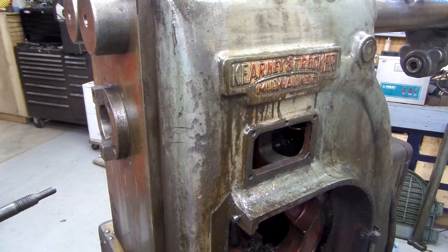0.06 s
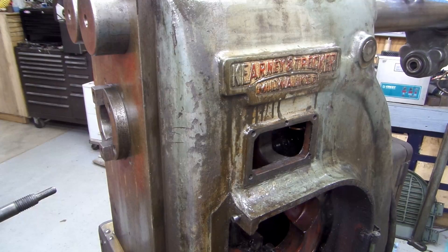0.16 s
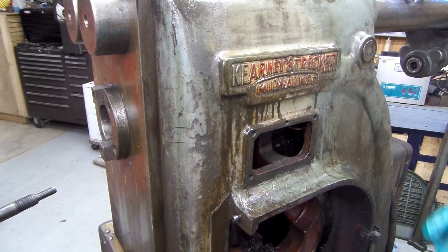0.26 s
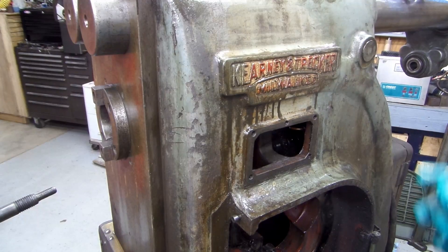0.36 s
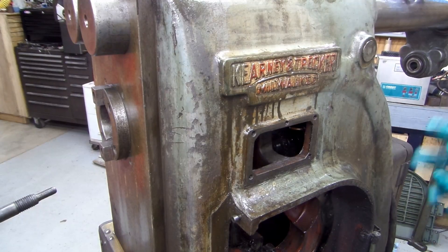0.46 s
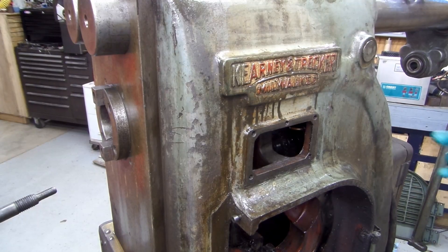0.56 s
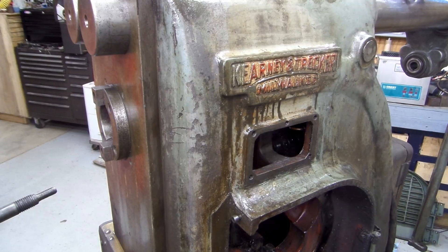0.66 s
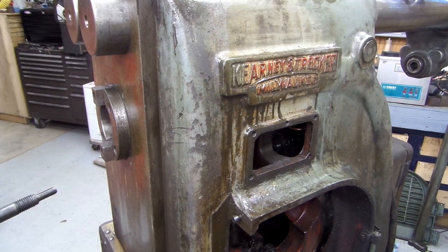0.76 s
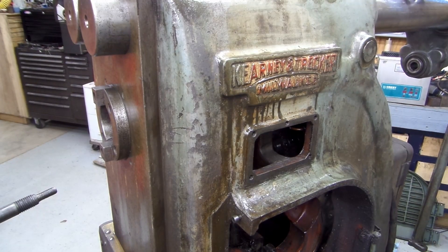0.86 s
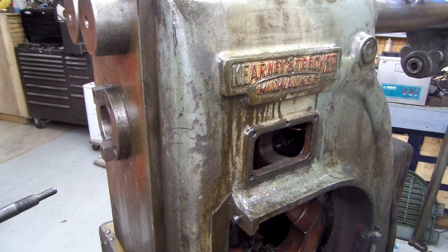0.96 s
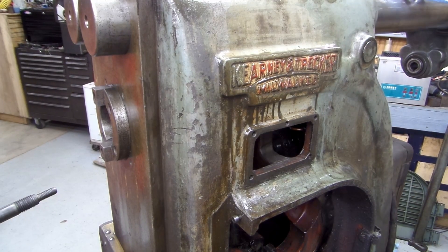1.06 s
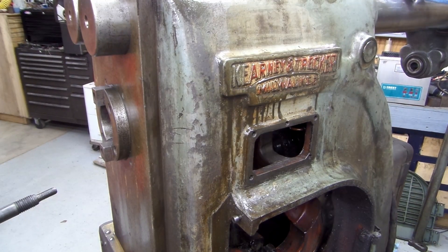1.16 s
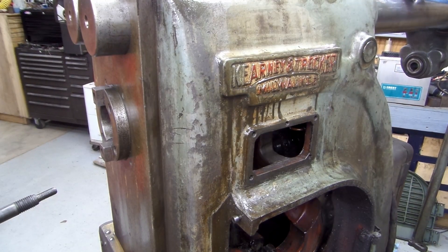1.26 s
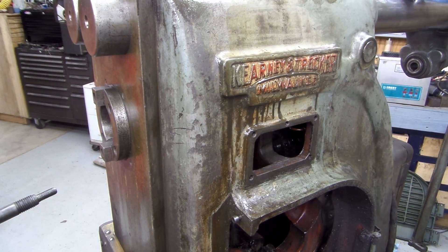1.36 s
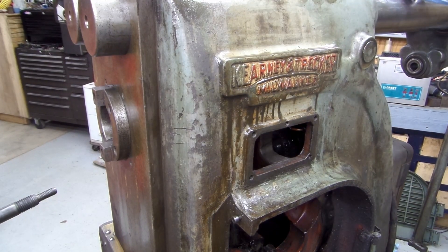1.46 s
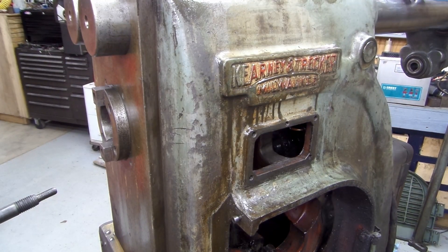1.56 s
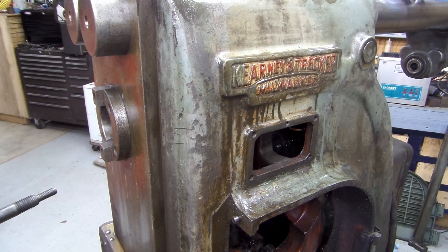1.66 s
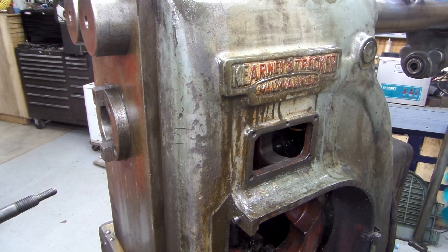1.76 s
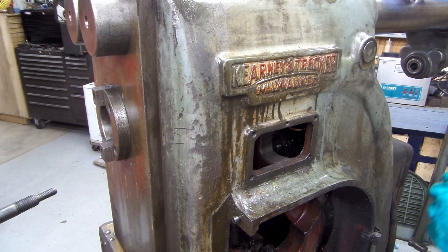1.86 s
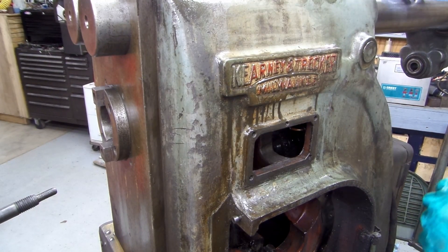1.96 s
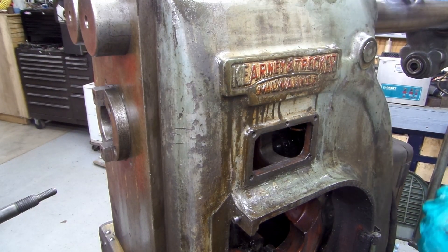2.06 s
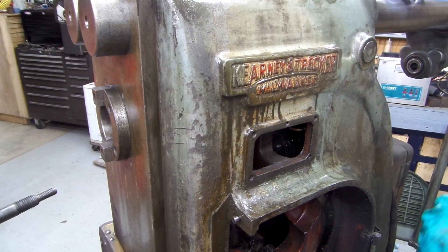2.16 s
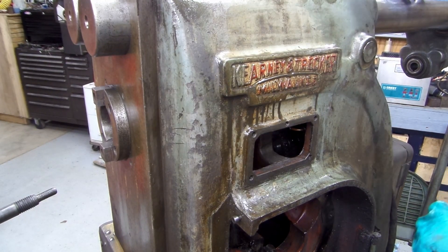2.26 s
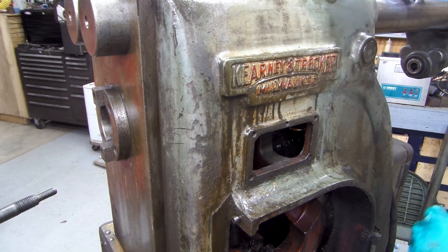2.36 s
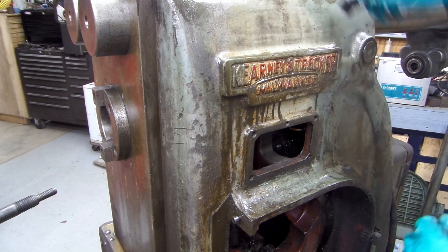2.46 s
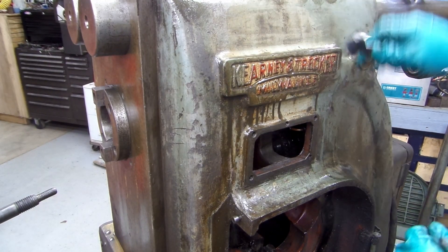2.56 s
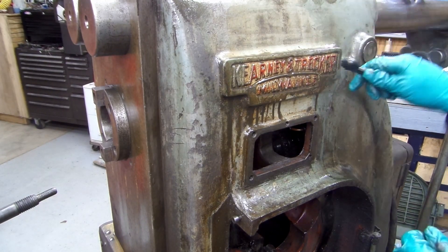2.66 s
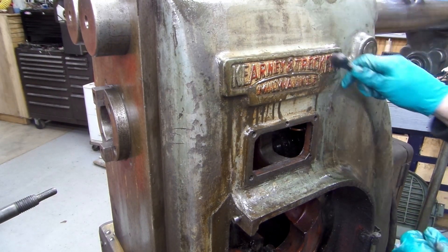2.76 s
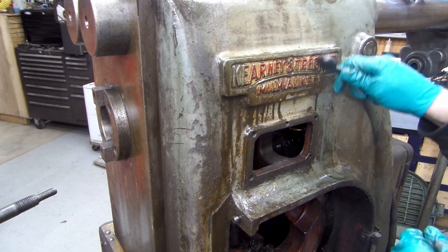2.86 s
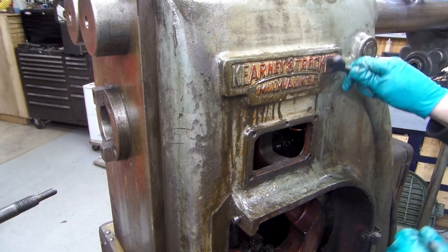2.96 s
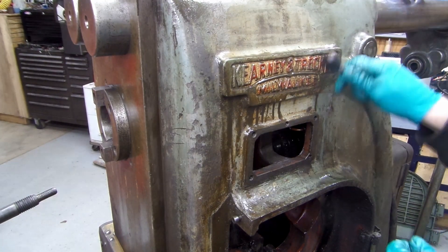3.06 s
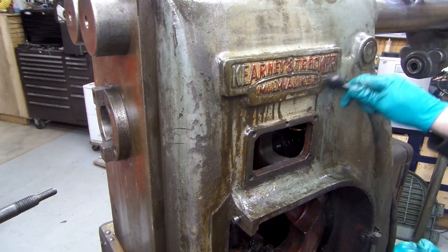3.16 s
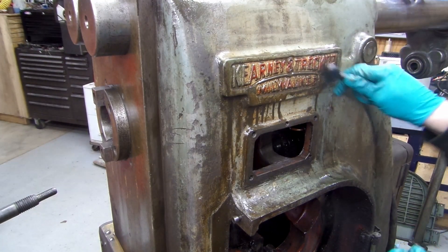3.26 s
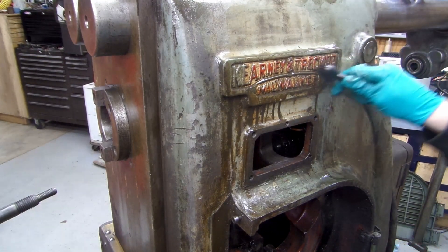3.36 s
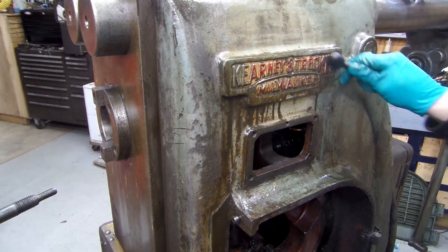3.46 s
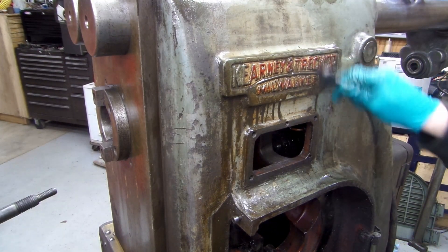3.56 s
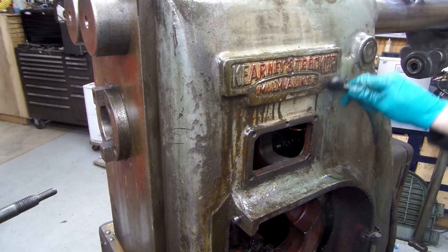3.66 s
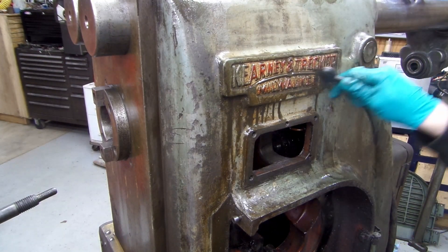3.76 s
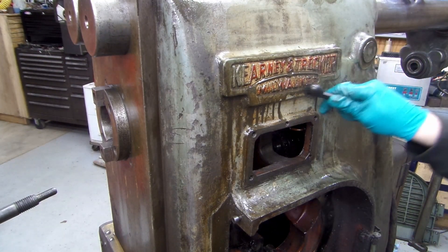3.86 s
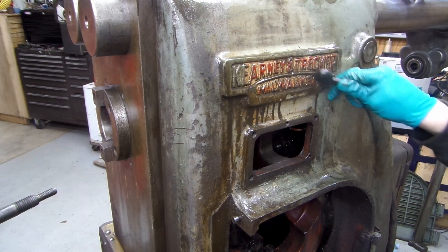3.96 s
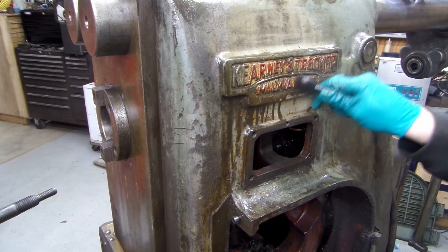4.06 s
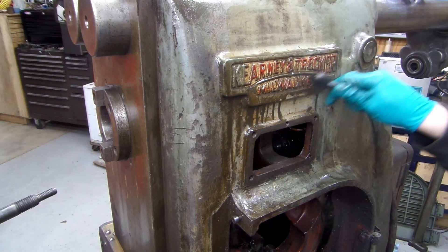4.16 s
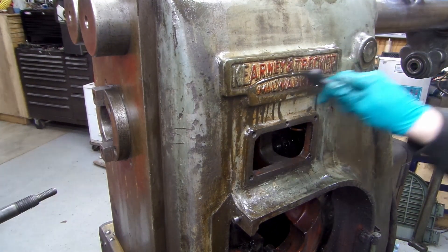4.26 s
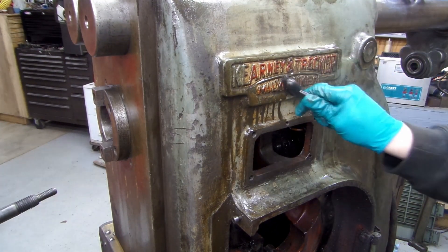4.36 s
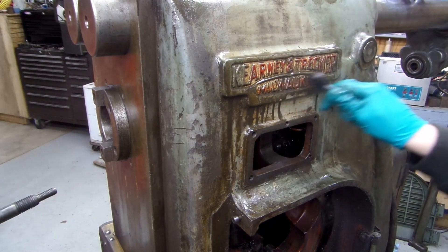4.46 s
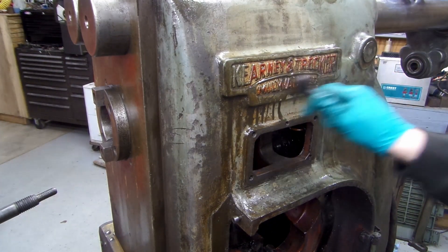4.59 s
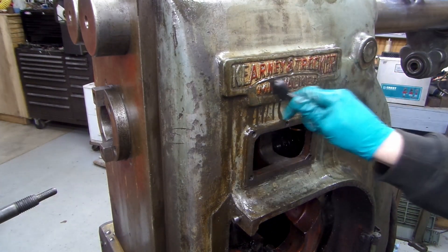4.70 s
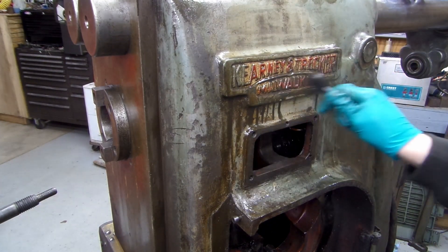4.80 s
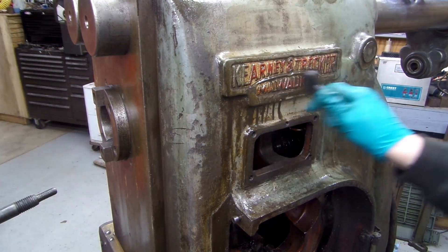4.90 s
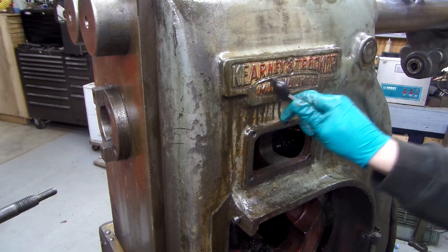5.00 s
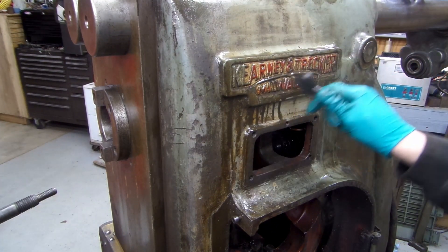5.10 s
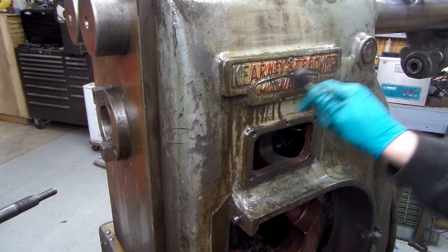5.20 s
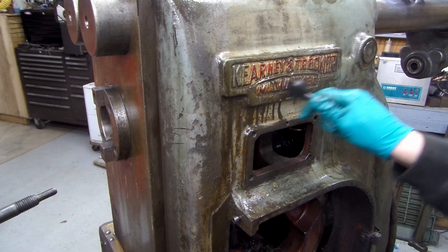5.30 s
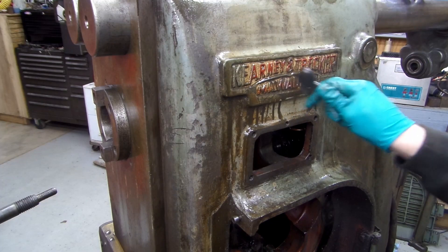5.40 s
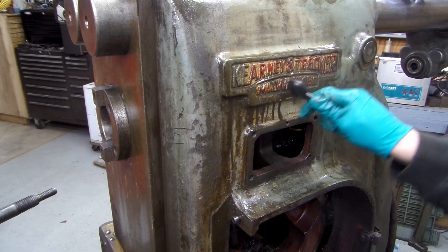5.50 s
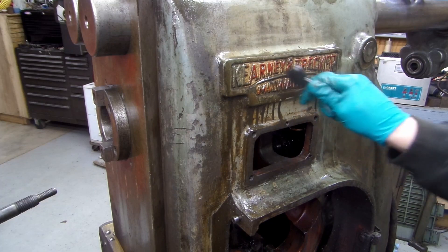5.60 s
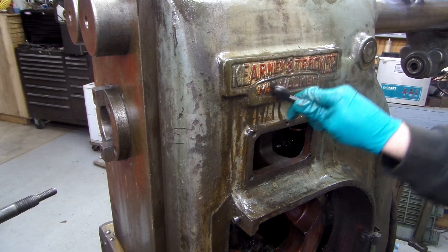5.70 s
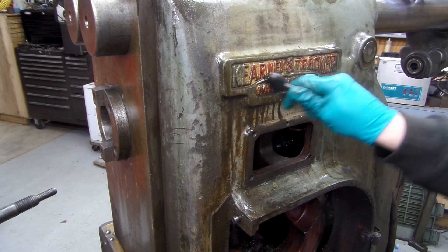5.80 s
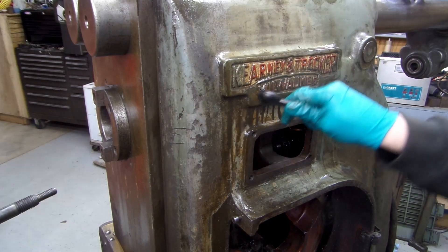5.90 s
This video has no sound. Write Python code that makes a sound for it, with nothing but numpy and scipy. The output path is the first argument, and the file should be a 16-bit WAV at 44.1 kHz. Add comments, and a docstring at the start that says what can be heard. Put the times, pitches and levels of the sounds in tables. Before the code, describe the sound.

A sleeve and gloves rustle softly, then a small stiff brush scrubs quickly back and forth on cast iron, with a dull knock.

```python
"""A small stiff brush scrubs to and fro, about six strokes a second, over raised letters on a cast-iron machine.
Its bristles rasp and flick by stick-slip friction, and tufts snap off the edges. Before the scrubbing,
a sleeve and gloves rustle as the hand comes up, and a faint hum swells and fades. A few dull knocks
excite the modes of the hollow casting. The workshop reverberates over a quiet background of air."""
import sys
import numpy as np
from scipy import signal
from scipy.fft import rfft, irfft
from scipy.io import wavfile
from scipy.ndimage import uniform_filter1d

SR = 44100
rng = np.random.default_rng(int(sys.argv[2]) if len(sys.argv) > 2 else 0)


def store_wav(level_fs):
    """Save 16-bit WAV to argv[1]."""
    pcm = np.round(np.clip(np.atleast_2d(level_fs), -1, 1) * 32767)
    wavfile.write(sys.argv[1], SR, pcm.T.astype(np.int16))


N = 261807

# Spectra of air, walls, cloth, casting and bristles as they sound; the swish and the bristles both carry a
# treble peak near 7.5 # kHz, a dip at 9-12 kHz and a rise at 15.5 kHz. Each row: frequency in Hz, relative
# level in dB.
AIR_SPECTRUM = [(25, -12), (42, -4), (72, 5.5), (130, 2.5), (200, -3.5), (460, -1.5), (2500, -6),
                (5000, -13.5), (7300, -20), (9000, -13), (12500, -18.5), (15500, -23)]
WALL_SPECTRUM = [(100, 3), (600, 1.5), (2500, 0.5), (5000, -5), (8000, -25), (10000, -8), (15000, -1.5)]
SWISH_SPECTRUM = [(200, -10), (1000, -11), (2000, -4), (3200, -0.5), (4800, -0.5), (6500, 1.5), (7700, 1),
                  (9000, -8), (11500, -7), (13500, -5.5), (15600, -0.5)]
SHUFFLE_SPECTRUM = [(25, -6), (45, -5), (70, 2.5), (95, 0), (130, -5.5), (250, 0), (600, -1), (1200, -2.5),
                    (2500, -7.5), (6000, -29.5)]
KNOCK_SPECTRUM = [(40, -16), (85, 5), (160, 1.5), (270, 1.5), (450, 2.5), (880, 4.5), (1100, -10),
                  (1400, -2.5), (1850, 21), (2400, 9), (4000, -21)]
BRISTLE_SPECTRUM = [(100, -27), (500, -19), (1100, -14), (1800, -9.5), (2400, -6), (3300, -6.5),
                    (5000, -2.5), (6800, -0.9), (7800, 0.55), (8700, -7.5), (10500, -8), (13000, -6.5),
                    (15600, -1.5)]
# Reverberation of the workshop. Each row: frequency in Hz, time to decay by 60 dB in seconds.
ROOM_T60 = [(150, 0.54), (700, 0.43), (2000, .36), (8000, 0.32), (15000, .28)]
# Swell of the hum. Each row: time of the peak in seconds, half length in seconds, level in dB.
HUM_SWELLS = [(.68, 0.15, -62.5)]
# Body movement as the hand comes up. Each row: time in seconds, relative level in dB.
BODY_MOTION = [(0.0, -79), (0.33, -66), (0.86, -56), (1.23, -72.5), (1.76, -88), (1.79, -70), (2.21, -70.5),
               (2.27, -61.5), (2.8, -75)]
# Slides of sleeve or glove. Each row: centre in seconds, half length in seconds, relative level in dB.
CLOTH_SWEEPS = [(.55, 0.014, -49), (.68, 0.029, -39.5), (.858, 0.029, -36.5), (.99, 0.046, -54),
                (1.29, .04, -66), (1.505, .025, -63.5), (1.8, .018, -56.5), (1.94, 0.024, -54),
                (2.09, 0.08, -62), (2.285, 0.031, -46), (2.4, 0.061, -56.5), (2.662, 0.018, -50.5)]
# Blows on the casting. Each row: time in seconds, relative peak in dB, pitch in Hz (lower is softer).
KNOCKS = [(0.269, -49.5, 250), (0.287, -72, 297), (3.628, -30.5, 544), (3.6565, -8.5, 552),
          (4.228, -41, 300), (4.254, -41, 219), (4.275, -39.5, 344), (4.884, -36, 151), (4.913, -36.5, 180)]
# Modes of the casting. Each row: frequency in Hz, relative level in dB, time to decay by 60 dB in seconds.
CASTING_MODES = [(137.9, 2.5, 0.34), (174, 1, 0.24), (242, 3, 0.32), (280.3, 2, 0.38), (300, 5.5, 0.23),
                 (355.3, 8, 0.26), (393, 0, 0.21), (450, -17, .25), (570, -7, .2), (650, -6, .2),
                 (718, 0, .17), (871, 8.5, 0.093)]
# A knock's direct path and reflections off near surfaces. Each row: delay in seconds, gain in dB.
KNOCK_PATHS = [(0, -3), (.005, -5), (.013, -4.5), (0.0236, -3.5), (.0307, -21.5)]
# Tufts springing off an edge. Each row: start in seconds, relative peak in dB.
SNAPS = [(3.5019, -14), (4.1124, -15), (4.3505, -12), (4.6618, -12), (5.2634, -14), (5.5014, -13),
         (5.688, -11), (5.8631, -12), (5.8814, -12), (5.8974, -12)]
# Brush strokes. Each row: time of fastest travel in seconds, half length in seconds,
# relative level in dB, whether the bristles meet the iron with their "tips" or lie "flat".
STROKES = [(2.893, .022, -35, "tips"), (2.945, 0.03, -37, "tips"), (3.011, 0.018, -32.5, "tips"),
           (3.092, .032, -38, "flat"), (3.17, 0.026, -27.5, "tips"), (3.23, 0.022, -36.5, "flat"),
           (3.348, .034, -29, "tips"), (3.485, 0.022, -32.5, "tips"), (3.571, 0.033, -30.5, "flat"),
           (3.636, 0.033, -23.5, "tips"), (3.816, 0.028, -31, "tips"), (3.892, 0.058, -33, "flat"),
           (4.131, 0.046, -30, "tips"), (4.249, 0.016, -32.5, "flat"), (4.39, 0.036, -23.5, "tips"),
           (4.534, 0.034, -31.5, "flat"), (4.705, 0.032, -20.5, "tips"), (4.858, 0.03, -26.5, "flat"),
           (5.021, 0.032, -21, "tips"), (5.168, 0.031, -29.5, "flat"), (5.291, .026, -24.5, "tips"),
           (5.411, 0.036, -34, "flat"), (5.522, 0.027, -26, "tips"), (5.715, 0.037, -25.5, "tips"),
           (5.904, 0.034, -24.5, "tips")]

STROKE_LEAN, STROKE_EDGE = 0.072, 4.64   # how much the rise outlasts the fall; steepness of the flanks
MEDIUM_STROKE_DB = -30.5


def from_db(db):
    """Amplitude grows tenfold with every 20 dB."""
    return 10 ** (np.asarray(db) / 20)


def unit_rms(x):
    """Normalisation to a mean power of 1."""
    return x / np.sqrt(np.mean(x ** 2) + 1e-20)


def at_hz(points, hz):
    """Interpolation on a logarithmic frequency axis."""
    known_hz, values = np.transpose(points)
    return np.interp(np.log(np.maximum(hz, 1)), np.log(known_hz), values)


def drift(rate_hz):
    """Low-passed noise gives a slow random fluctuation of rms 1."""
    pole = np.exp(-2 * np.pi * rate_hz / SR)
    return unit_rms(signal.lfilter([1], [1, -2 * pole, pole * pole], rng.standard_normal(N + SR))[SR:])


def zero_phase(x, order, hz, kind="low"):
    """Filtering forwards and backwards cancels the phase shift."""
    return signal.sosfiltfilt(signal.butter(order, hz, kind, fs=SR, output="sos"), x)


def colour(x, spectrum, size=4096):
    """A minimum-phase filter of unit energy imposes a spectrum causally."""
    cepstrum = irfft(np.log(from_db(at_hz(spectrum, np.linspace(0, SR / 2, size // 2 + 1)))))
    cepstrum[1:size // 2] *= 2
    cepstrum[size // 2 + 1:] = 0
    pulse = irfft(np.exp(rfft(cepstrum)))
    return signal.fftconvolve(x, pulse / np.linalg.norm(pulse))[:len(x)]


def slips(per_s, spread_db):
    """Stick-slip friction as a Poisson train of impulses, mostly small and a few large; rms 1."""
    sizes = from_db(spread_db * np.minimum(rng.exponential(1, N), 5))
    return unit_rms(sizes * rng.choice([-1, 1], N) * (rng.random(N) < per_s / SR))


def wander(x, depth_db, width_hz, hold_s):
    """Random modulation in time and frequency makes narrow peaks and dips come and go."""
    hz, s, spectra = signal.stft(x, SR, nperseg=1024)
    field = uniform_filter1d(rng.standard_normal(spectra.shape), max(round(width_hz / hz[1]), 1), axis=0)
    field = unit_rms(uniform_filter1d(field, max(round(hold_s / s[1]), 1), axis=1))
    return signal.istft(spectra * unit_rms(from_db(depth_db * field)), SR)[1][:N]


def swells(rows, lean, edge):
    """Overlapping swells add in power; each rises, holds briefly and falls."""
    t, power = np.arange(N) / SR, 0
    for s, half_s, db, *_ in rows:
        away = np.abs(t - s) / (half_s * (1 + lean * np.sign(s - t)))
        power = power + from_db(db) ** 2 / (1 + away ** edge)
    return np.sqrt(power)


def contact(touch_s=2.846, landing_s=0.0093):
    """Friction needs contact: 0 while the brush is in the air, 1 once it is on the iron."""
    return np.sqrt((1 + np.tanh((np.arange(N) / SR - touch_s) / landing_s)) / 2)


def travel_db(turning_db=-47.5):
    """Hand speed as a level, with a floor because the bristles keep rubbing at the turns."""
    return 20 * np.log10(np.hypot(swells(STROKES, STROKE_LEAN, STROKE_EDGE), from_db(turning_db)))


def air(level_db=-65.5):
    """The background of still air is stationary noise, strongest in the bass."""
    return from_db(level_db) * colour(rng.standard_normal(N), AIR_SPECTRUM)


def workshop(first_wall_s=0.0037):
    """The room's impulse response: a diffuse field decays exponentially, sooner in the treble."""
    age, bin_hz = np.arange(SR) / SR, np.arange(SR // 2 + 1)
    echoes = rfft(rng.standard_normal(SR))
    edges, tail = np.geomspace(30, SR / 2, num=11), 0
    for low, high in zip(edges, edges[1:]):
        band = irfft(echoes * ((bin_hz >= low) & (bin_hz < high)), SR)
        tail = tail + band * from_db(-60 * age / at_hz(ROOM_T60, np.sqrt(low * high)))
    tail = tail * (age > first_wall_s)
    return colour(tail / np.linalg.norm(tail), WALL_SPECTRUM)


def hum(hz=167.0, waver=0.0091):
    """A faint low tone swells and fades, wavering by slight frequency modulation."""
    phase = 2 * np.pi * np.cumsum(hz * (1 + waver * drift(10))) / SR
    return swells(HUM_SWELLS, lean=0.089, edge=7.0) * np.sin(phase)


def clothes(swish_db=1.5, shuffle_db=1.5, creep_db=-68, arm_db=-56):
    """Sliding friction between fibres gives a fine-grained swish over a soft, dark shuffle."""
    motion_db = np.interp(np.arange(N) / SR, *np.transpose(BODY_MOTION))
    scrubbing = contact()
    # between sweeps the cloth keeps creeping as the body moves
    swing_db = motion_db - np.mean(BODY_MOTION, axis=0)[1]
    creep = from_db(creep_db + 0.38 * swing_db + 1.5 * drift(24))
    sweeps = swells(CLOTH_SWEEPS, lean=-0.035, edge=3.6)
    sliding = from_db(swish_db) * np.hypot(sweeps, creep) * (1 - scrubbing)
    fibres = slips(per_s=16000, spread_db=1.8) * from_db(.6 * drift(60))
    fibres = wander(fibres, depth_db=2.6, width_hz=220, hold_s=.09)
    swish = sliding * colour(fibres, SWISH_SPECTRUM)
    # a quicker slide hisses higher
    hiss = np.sqrt(sliding / sliding.max()) * zero_phase(swish, order=2, hz=9000, kind="high")
    # the shuffle follows the body, then the working arm
    body = from_db(motion_db + shuffle_db)
    arm = scrubbing * from_db(arm_db + 0.086 * (travel_db() - MEDIUM_STROKE_DB))
    return swish + hiss + (body + arm) * colour(rng.standard_normal(N), SHUFFLE_SPECTRUM)


def knocks(ring_db=-19.0):
    """Soft impacts excite the casting's damped modes, and their thuds reflect off near surfaces."""
    t, age, blows = np.arange(N) / SR, np.arange(SR // 2) / SR, 0
    for s, db, hz in KNOCKS:
        # a smooth hump of force radiates its curvature
        force = 1 - np.tanh(np.pi * hz * (t - s)) ** 2
        blows = blows + from_db(db) * force * (3 * force - 2)
    # the hollow body colours the blows; the highest peak keeps its height
    thuds = colour(blows, KNOCK_SPECTRUM)
    thuds = thuds * np.abs(blows).max() / np.abs(thuds).max()
    modes = sum(from_db(db - 60 * age / t60) * np.cos(2 * np.pi * hz * age)
                for hz, db, t60 in CASTING_MODES)
    ring = signal.fftconvolve(thuds, modes / np.linalg.norm(modes))[:N]
    arrivals = sum(from_db(db) * np.interp(t - delay, t, thuds) for delay, db in KNOCK_PATHS)
    return from_db(ring_db) * ring + arrivals


def iron_reflection(direct, delay_s=0.001412, sway=0.065, echo_db=-11.5):
    """Interference with the echo off the iron cuts comb notches, which move as the hand sways."""
    t = np.arange(N) / SR
    mirrored = zero_phase(direct, order=1, hz=3500)
    lag_s = delay_s * (1 + sway * drift(2.6))
    return direct + from_db(echo_db) * np.interp(t - lag_s, t, mirrored)


def snaps(decay_s=0.00025, gain_db=-0.5):
    """Elastic release: a bent tuft springs off an edge in a bright, sub-millisecond burst."""
    out, age = np.zeros(N), np.arange(SR // 100) / SR
    for s, db in SNAPS:
        flicks = rng.standard_normal(len(age)) * np.exp(-age / decay_s)
        burst = record(colour(np.diff(flicks, prepend=0), BRISTLE_SPECTRUM))
        start = round(s * SR)
        out[start:start + len(age)] += from_db(db + gain_db) * burst / np.abs(burst).max()
    return out


def brush(rub_db=-1.5, flick_db=-3.0, bunching_db=1.5, gain_db=0.93, flat_rasp_db=4.0):
    """Bristles rub and flick by stick-slip friction; faster travel gives louder and denser flicks."""
    speed_db, touching = travel_db(), contact()
    speed = from_db(speed_db) * touching
    pace = speed / speed.max()
    flicks = slips(per_s=500 + 9000 * pace, spread_db=3.0) / np.sqrt(.05 + pace)
    flicks = signal.lfilter([1, -.7], [1], flicks)   # single tips sound brighter than the rub
    flicks = flicks / np.std(flicks[touching ** 2 > .5])
    friction = from_db(rub_db) * rng.standard_normal(N) + from_db(flick_db) * flicks
    # bristles catch and let go in bunches, and their resonances shift as they bend
    friction = friction * from_db(bunching_db * drift(128))
    friction = wander(friction, depth_db=2.4, width_hz=200, hold_s=.07)
    scrub = from_db(gain_db) * speed * colour(friction, BRISTLE_SPECTRUM)
    # a slow or flat brush rasps lower than a fast one on its tips
    flat_strokes = [row for row in STROKES if row[3] == "flat"]
    flatness = swells(flat_strokes, STROKE_LEAN, STROKE_EDGE) / from_db(speed_db)
    shelf_db = -3.5 - 0.22 * (speed_db - MEDIUM_STROKE_DB) + flat_rasp_db * flatness ** 2
    rasp = zero_phase(scrub, order=2, hz=4500)
    return scrub + (from_db(shelf_db) - 1) * rasp


def scene(brush_room_db=-9.0, knock_room_db=-10.0, cloth_room_db=-11.5):
    """Superposition: brush, knocks and clothes add to their reverberation, the air and the hum."""
    scrub = iron_reflection(brush() + snaps())
    thuds, rustle = knocks(), clothes()
    sent = from_db(brush_room_db) * scrub + from_db(knock_room_db) * thuds
    sent = sent + from_db(cloth_room_db) * rustle
    reverberation = signal.fftconvolve(sent, workshop())[:N]
    return (air() + hum() + reverberation + rustle + thuds + scrub)[None]


def record(dry, cutoff_hz=15800):
    """Band limiting: an elliptic low-pass filter cuts the highest treble steeply."""
    return signal.sosfilt(signal.ellip(12, .1, 80, cutoff_hz, fs=SR, output="sos"), dry)


dry = scene()
out = record(dry)
store_wav(out)
```